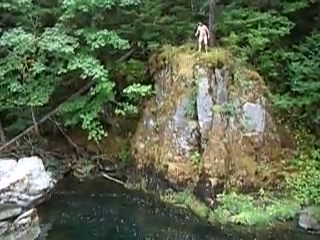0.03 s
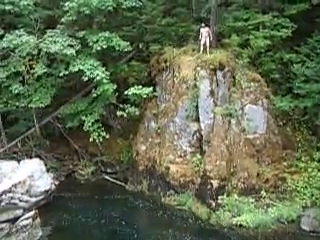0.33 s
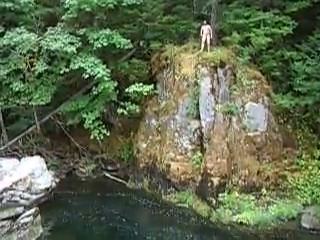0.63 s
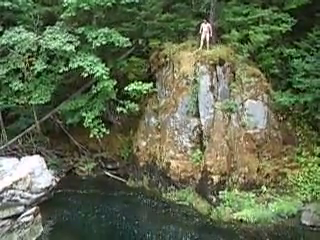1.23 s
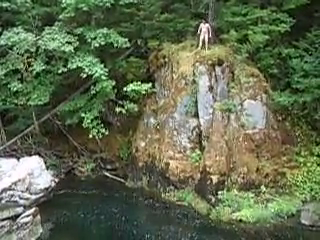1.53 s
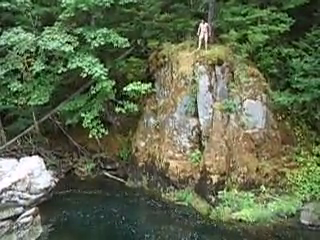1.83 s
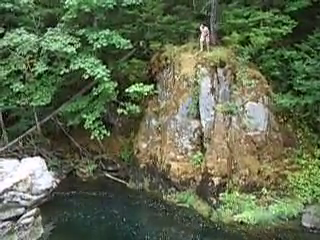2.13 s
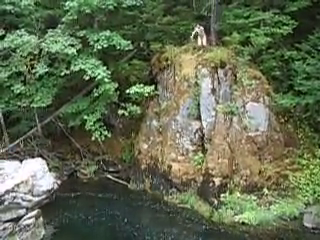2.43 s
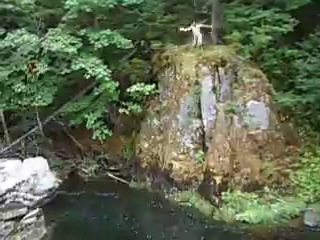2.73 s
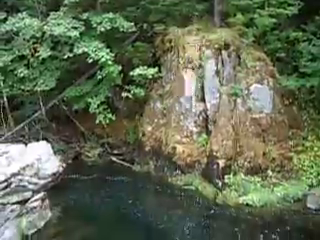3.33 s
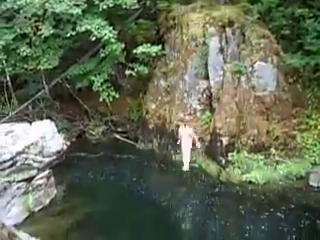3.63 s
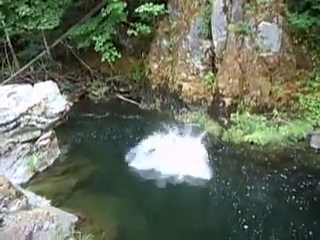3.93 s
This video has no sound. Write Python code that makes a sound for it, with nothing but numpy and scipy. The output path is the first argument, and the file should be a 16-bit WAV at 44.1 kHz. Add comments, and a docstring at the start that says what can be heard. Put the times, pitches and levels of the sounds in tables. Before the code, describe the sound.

Steady bubbling rush of a stream, ending in one loud splash as someone jumps in.

```python
"""A rocky forest pool: a creek runs through it, a steady broad rush with small bubbles and low gurgles.
Near the end a person drops in from a rock: the water slaps, air pockets plop, the cavity gulps shut
and throbs, and spray falls back. A small narrow-band microphone overloads on the splash."""
import sys
import numpy as np
from scipy import signal
from scipy.fft import rfft, irfft
from scipy.io import wavfile

SR = 44100
rng = np.random.default_rng(int(sys.argv[2]) if len(sys.argv) > 2 else 0)


def unload_audio(sound):
    """Save the sound as a 16-bit wav file, at the path given as the first command line argument."""
    columns = np.transpose(np.atleast_2d(sound))
    # keep every value between -1 and 1, then stretch to whole-number steps
    steps = np.round(np.clip(columns, -1, 1) * 32767)
    wavfile.write(sys.argv[1], SR, steps.astype(np.int16))


N = 176400
TIME_S = np.arange(N) / SR
BIN_HZ = np.maximum(np.arange(N // 2 + 1) * SR / N, 1)
BAND_STOP_HZ = 4775


def from_db(db):
    """Decibels to gain."""
    return 10 ** (np.asarray(db) / 20)


def unit_rms(x):
    """Scale to rms 1."""
    return x / np.sqrt(np.mean(x ** 2) + 1e-20)


def drift(corner_hz):
    """Smooth random wander, rms 1."""
    hop, settle = 40, 2000
    pole = np.exp(-2 * np.pi * corner_hz * hop / SR)
    white = rng.standard_normal(N // hop + settle + 2)
    slow = signal.lfilter([1], [1, -2 * pole, pole * pole], white)[settle:]
    return np.interp(np.arange(N) / hop, np.arange(len(slow)), unit_rms(slow))


def envelope(start_s, attack_s, hold_s, fall_db_per_s):
    """Linear rise, hold, exponential fall."""
    age_s = TIME_S - start_s
    fall_db = fall_db_per_s * np.maximum(age_s - attack_s - hold_s, 0)
    return np.clip(age_s / attack_s, 0, 1) * from_db(-fall_db)


def colour(x, spectrum):
    """Shape by (Hz, dB) rows and band-limit; rms 1."""
    hz, db = np.transpose(spectrum)
    gain = from_db(np.interp(np.log(BIN_HZ), np.log(hz), db))
    band_limit = (BIN_HZ < BAND_STOP_HZ) * np.minimum(BIN_HZ / hz[0], 1)
    return unit_rms(irfft(rfft(x) * gain * band_limit, N))


def rush():
    """Distant white water: each half octave flickers alone; the low bands swell and sink together."""
    # Each row: frequency in Hz, relative spectral density in dB.
    spectrum = [(25, -12), (55, -6), (110, -1.5), (165, .5), (220, -2.5), (310, -2), (490, -7.5), (850, -7),
                (1300, -12.5), (2300, -18.5), (3300, -16.5), (4500, -25)]
    # Each row: time in seconds, low-band level about its mean in dB.
    low_swell = [(0, -0.7), (.32, 1.5), (.68, -1.4), (.9, 0.5), (1.33, 0.5), (1.5, -0.1), (2.1, 0.1),
                 (2.35, -0.5), (2.7, 1.3), (2.88, 2), (3.15, 0.3), (3.42, -3), (3.7, -0.7)]
    bands, base_hz, swell_top_hz = 15, 35, 330
    level_db, flicker_db, surge_db = -26, 0.5, 0.44
    white = rfft(rng.standard_normal(N))
    swell_db = np.interp(TIME_S, *np.transpose(low_swell))
    band_index = np.clip(2 * np.log2(BIN_HZ / base_hz), 0, bands - 1)
    out = 0
    for k in range(bands):
        hz = base_hz * 2 ** (k / 2)
        band = irfft(white * np.maximum(1 - abs(band_index - k), 0), N)
        out += band * from_db(flicker_db * drift(corner_hz=16) + swell_db * (hz < swell_top_hz))
    return from_db(level_db + surge_db * drift(corner_hz=1)) * colour(out, spectrum)


def bubble_cloud(per_s, low_hz, high_hz, pitches, t60_cycles, spread_db, tilt_db_per_oct):
    """Bubbles of random strength and pitch, each ringing a few cycles; rms 1."""
    strengths = from_db(spread_db * np.minimum(rng.exponential(1, N), 5)) * rng.choice([-1, 1], N)
    kicks = strengths * (rng.random(N) < per_s / SR)
    pitch_index = rng.integers(0, pitches, N)
    out = 0
    for k, hz in enumerate(np.geomspace(low_hz, high_hz, pitches)):
        radius = np.exp(-np.log(1000) * hz / (t60_cycles * SR))
        resonator = [1, -2 * radius * np.cos(2 * np.pi * hz / SR), radius * radius]
        ring = signal.lfilter([1, 0, -1], resonator, kicks * (pitch_index == k) + 1e-18)
        out += from_db(tilt_db_per_oct * np.log2(hz / low_hz)) * ring
    return unit_rms(out)


def creek():
    """The rush, bubbles in the riffles, gurgles between the stones."""
    bubbles = bubble_cloud(per_s=900, low_hz=445, high_hz=3700, pitches=36,
                           t60_cycles=11, spread_db=3.5, tilt_db_per_oct=-2.5)
    gurgles = bubble_cloud(per_s=70, low_hz=125, high_hz=390, pitches=14,
                           t60_cycles=9, spread_db=2.5, tilt_db_per_oct=0.7)
    return rush() + from_db(-39.5) * bubbles + from_db(-36) * gurgles


def slap():
    """The surface tears in three bursts: entry, body, cavity closing."""
    # Each row: start in seconds, level in dB, hold in seconds, fall in dB per second.
    bursts = [(3.799, -7.5, 0.015, 600), (3.827, -7.5, 0.0095, 280), (3.878, -8, 0.013, 448)]
    # Each row: frequency in Hz, relative spectral density in dB.
    spectrum = [(40, -35), (150, -14.5), (300, -6), (500, -3.5), (750, -0.5), (950, -7.5), (1300, -5.5),
                (1650, -11.5), (2200, -10.5), (3300, -15), (4500, -19)]
    attack_s = 0.002
    power = sum((from_db(db) * envelope(start_s, attack_s, hold_s, fall_db_per_s)) ** 2
                for start_s, db, hold_s, fall_db_per_s in bursts)
    return np.sqrt(power) * colour(rng.standard_normal(N), spectrum)


def trapped_air():
    """Small pockets ring as they pinch off; the big cavity behind the body throbs a few deep cycles."""
    # Each row: start in seconds, pitch in Hz, peak in dB, t60 in seconds.
    pockets = [(3.801, 493.3, -14, 0.28), (3.802, 714, -10, .35), (3.838, 156, -14, 0.23),
               (3.856, 291, -8, 0.17), (3.868, 389.5, -15.5, 0.26), (3.881, 677, -13.5, 0.24)]
    cavity_s, cavity_hz = 3.857, 41.2
    throb = from_db(-12.5) * envelope(cavity_s, attack_s=0.014, hold_s=0.041, fall_db_per_s=300)
    out = throb * np.sin(2 * np.pi * cavity_hz * (TIME_S - cavity_s))
    for start_s, hz, db, t60_s in pockets:
        plop = from_db(db) * envelope(start_s, attack_s=0.003, hold_s=0, fall_db_per_s=60 / t60_s)
        out += plop * np.sin(2 * np.pi * hz * (TIME_S - start_s))
    return out


def spray():
    """Thrown water swells up and patters back in clumps."""
    # Each row: frequency in Hz, relative spectral density in dB.
    spectrum = [(30, -8), (70, -3), (130, -1), (200, -4), (290, 0.5), (550, -9), (750, -3), (1000, -10),
                (1800, -9), (2400, -16.5), (3300, -11.5), (4500, -28)]
    clump_db = 2 * drift(corner_hz=170)
    drops = rng.standard_normal(N) * from_db(clump_db)
    swell = envelope(start_s=3.83, attack_s=0.028, hold_s=0.043, fall_db_per_s=97)
    return from_db(-11) * swell * colour(drops, spectrum)


def scene():
    """Creek and plunge, mono."""
    return (creek() + slap() + trapped_air() + spray())[None]


def record(dry):
    """Microphone overload, telephone-width low-pass, hard clip on the tallest peaks."""
    saturation, ceiling = 0.81, 0.76
    band_edge_hz, cutoff_hz = 3600, 15800
    x = saturation * np.tanh(dry / saturation)
    x = signal.sosfilt(signal.butter(11, band_edge_hz, fs=SR, output="sos"), x)
    x = signal.sosfilt(signal.cheby2(16, 60, BAND_STOP_HZ, fs=SR, output="sos"), x)
    x = np.clip(x, -ceiling, ceiling)
    return signal.sosfilt(signal.ellip(10, 0.1, 80, cutoff_hz, fs=SR, output="sos"), x)


dry = scene()
out = record(dry)
unload_audio(out)
```